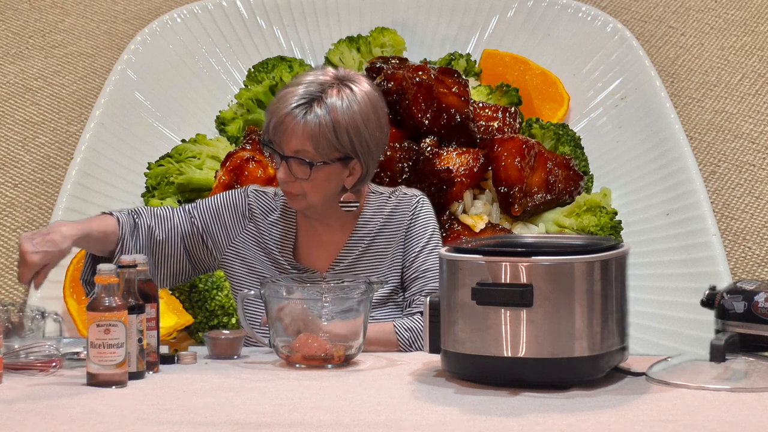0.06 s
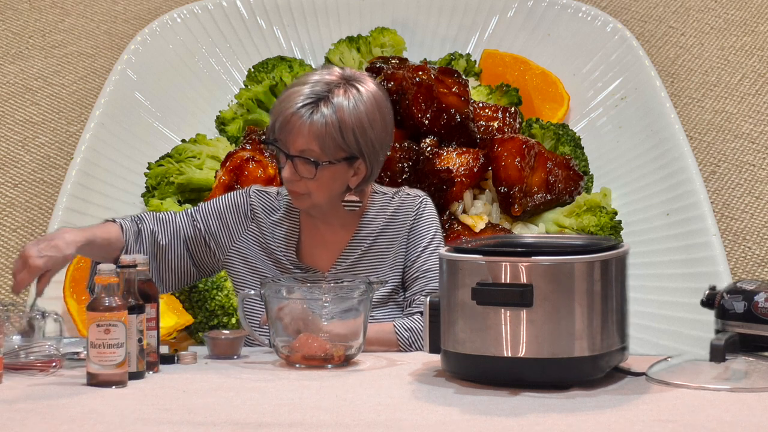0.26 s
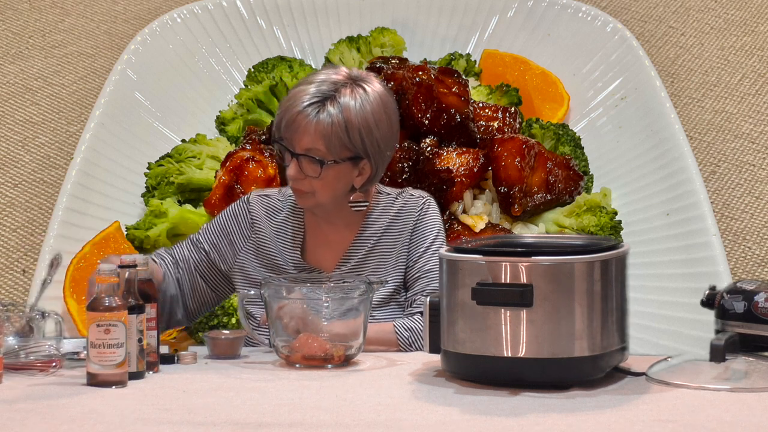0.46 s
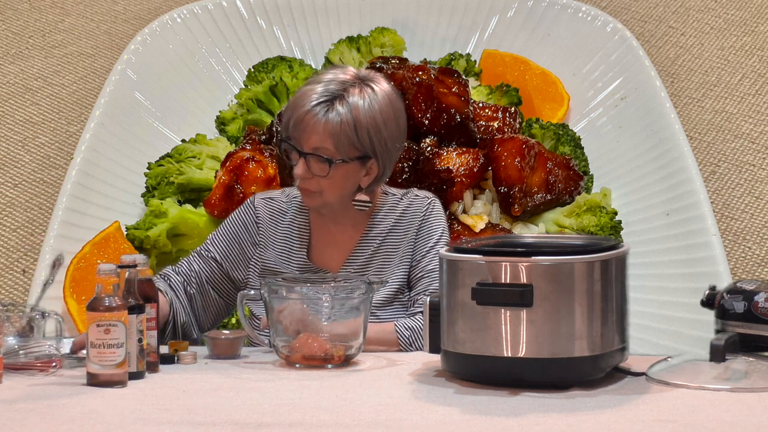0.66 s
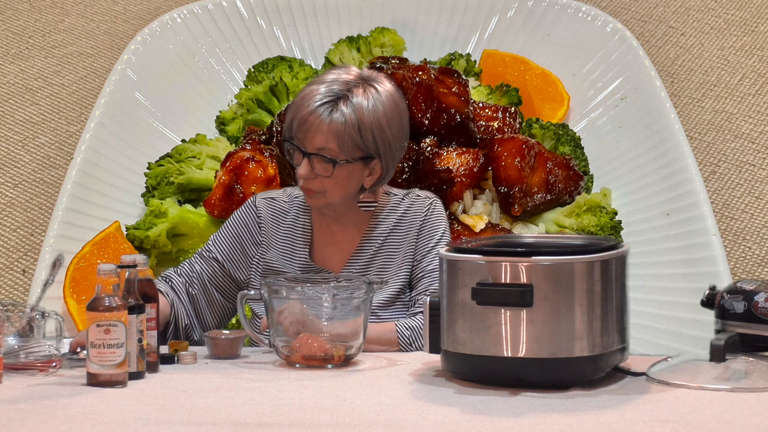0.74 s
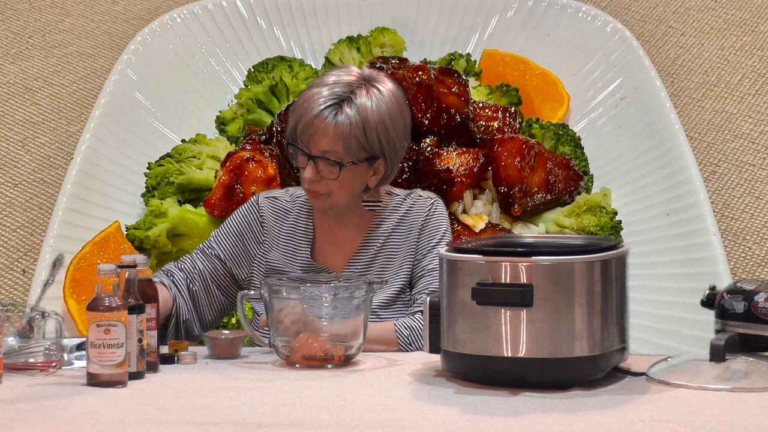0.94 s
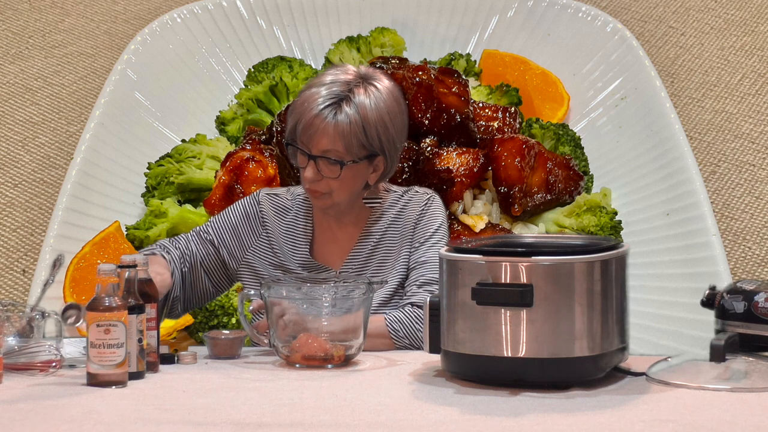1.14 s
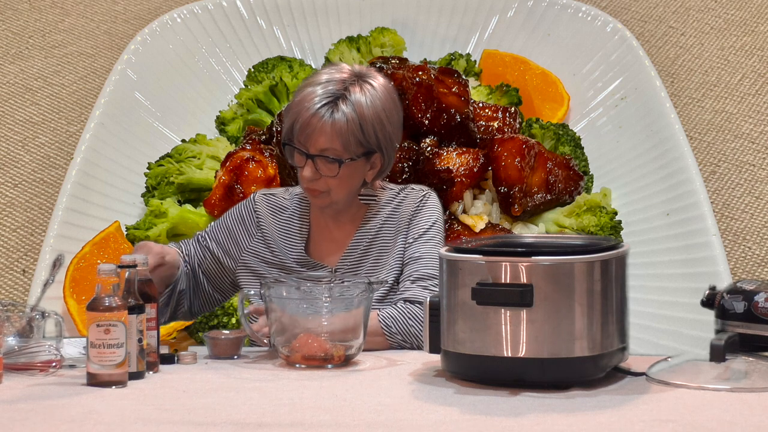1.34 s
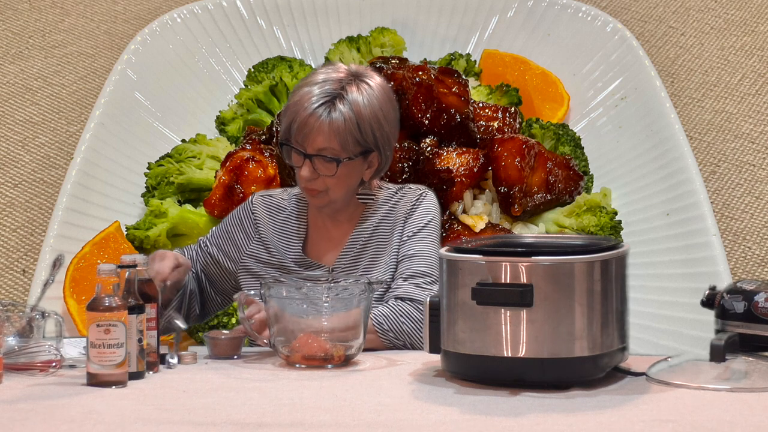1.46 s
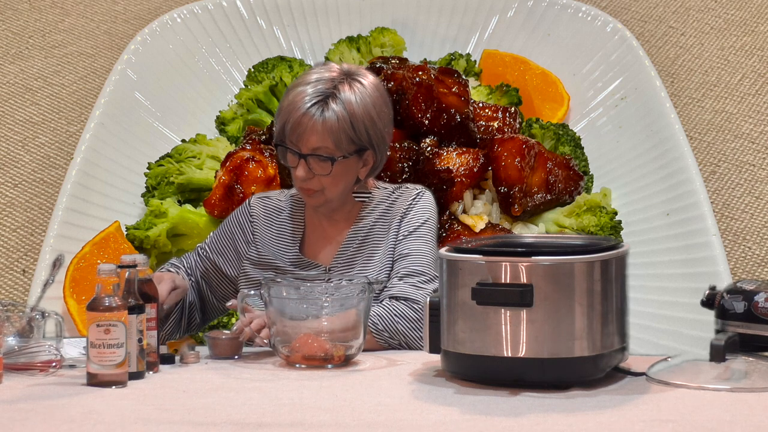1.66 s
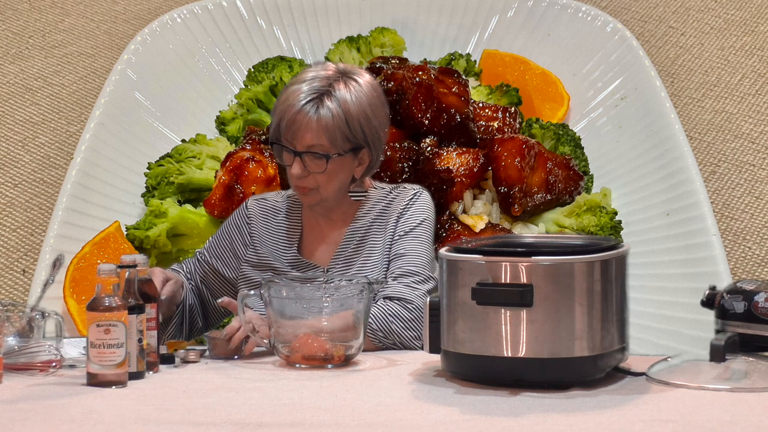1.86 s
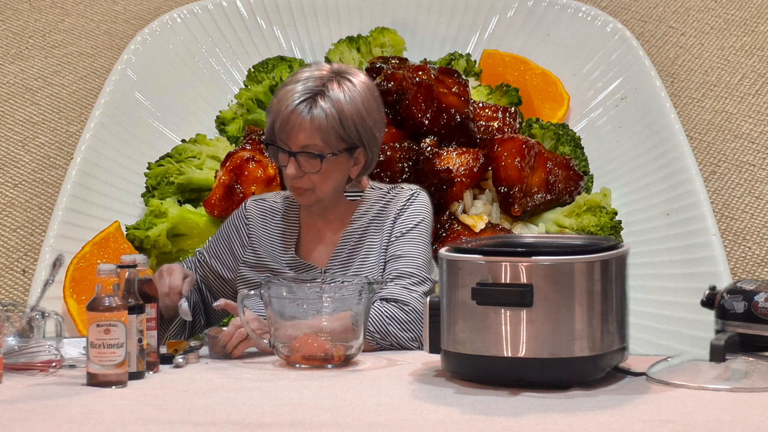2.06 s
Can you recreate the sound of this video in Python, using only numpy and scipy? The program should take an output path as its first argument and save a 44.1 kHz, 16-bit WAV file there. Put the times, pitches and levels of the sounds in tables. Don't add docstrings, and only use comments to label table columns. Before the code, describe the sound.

Clinking steel measuring utensils: light glass taps and a rattling drop, a short gritty slide, a brief pause, then a sharp bright clatter of cups and a few softer taps, recorded close in a reverberant room.

```python
import sys
import numpy as np
from scipy import signal
from scipy.fft import rfft, irfft, next_fast_len
from scipy.io import wavfile

SR = 44100
rng = np.random.default_rng(int(sys.argv[2]) if len(sys.argv) > 2 else 0)


def linear_from_db(decibels):
    return 10 ** (np.asarray(decibels, float) / 20)


def output_pcm(signal):
    pcm = np.clip(np.atleast_2d(signal).T, -1, 1) * 32767
    wavfile.write(sys.argv[1], SR, np.round(pcm).astype(np.int16))


N = 92610


def unit(x):
    return x / np.sqrt(np.mean(x ** 2) + 1e-20)


def along(points, hz):
    f, v = np.transpose(points)
    return np.interp(np.log(hz + 1), np.log(f + 1), v)


def filtered(x, response):
    n = x.shape[-1]
    m = next_fast_len(n + 8192)
    return irfft(rfft(x, m) * response(np.fft.rfftfreq(m, 1 / SR)), m)[..., :n]


def paired(pair, alike, gain=lambda hz: 1):
    def mid_side_gain(hz):
        turn = np.arccos(np.clip(along(alike, hz), -1, 1)) / 2
        return gain(hz) * np.array([np.cos(turn), np.sin(turn)])

    mid, side = filtered(pair, mid_side_gain)
    return np.array([mid + side, mid - side])


def resonance(center, width):
    return lambda f: 1j * f * width / (center * center - f * f + 1j * f * width)


def wobble(count, size, rate):
    at = np.arange(size) * rate / SR
    return np.array([np.interp(at, np.arange(len(row)), row) for row in rng.standard_normal((count, 400))])


# (frequency [Hz], t60 [s])
ROOM_DECAY = [(500, 0.78), (2000, 0.57), (5000, 0.32), (12000, 0.24)]
# (frequency [Hz], likeness [0..1])
ROOM_ALIKE = [(700, 0.39), (2500, 0.61), (5000, 0.82), (9000, 1), (14000, 0.71)]


def room(x):
    hz, t, z = signal.stft(rng.standard_normal((2, SR // 2)), SR, nperseg=256)
    decay = linear_from_db(-60 * t / along(ROOM_DECAY, hz)[:, None])
    tail = paired(signal.istft(z * decay, SR, nperseg=256)[1], ROOM_ALIKE)
    tail = tail * (1 - np.exp(-np.arange(tail.shape[1]) / SR / 0.0017))
    return signal.fftconvolve(x[None], tail / np.linalg.norm(tail[0]), axes=1)


def struck(hits, modes, clatter, ring_db, rough, clatter_db, clatter_t60, click_t60, tick_db, wet_db, pan_db,
           damped_s=np.inf):
    out, t = np.zeros((2, N + 2 * SR)), np.arange(SR * 2 // 5) / SR
    crowd_db = 3.5 * rng.standard_normal(500)
    hz, level, t60 = np.transpose(modes)[:, :, None]
    loudest = max(hit[1] for hit in hits)
    low_cut = signal.butter(6, 946, "high", fs=SR, output="sos")
    steadiness = np.repeat(np.clip(hz / 4200, .45, 1), 2, axis=0)

    def clatter_gain(f):
        return linear_from_db(along(clatter, f) + np.interp(f / 50, np.arange(500), crowd_db))

    for s, db, share_db, click_hz in hits:
        shake = wobble(count=2 * len(modes), size=len(t), rate=110.6) * rough * steadiness
        swell, phase = 4.6 * shake[::2], 1.64 * shake[1::2]
        ring = linear_from_db(level + swell - 60 * t / t60) * np.sin(2 * np.pi * hz * t + phase)
        ring = ring.sum(0) * linear_from_db(-np.clip(s + t - damped_s, 0, .015) * 900)

        click = linear_from_db(-60 * t / click_t60) * np.sin(2 * np.pi * click_hz * t)
        click = click * (1 - np.exp(-t / 0.000085)) * 1.17
        tick = linear_from_db(tick_db) * (t == 0)

        noise = unit(filtered(rng.standard_normal(len(t)), clatter_gain)) * linear_from_db(-60 * t / clatter_t60)
        body = linear_from_db(ring_db) * ring + linear_from_db(clatter_db) * noise
        blow = click + tick + linear_from_db(share_db) * body * (1 - np.exp(-t / 0.00052))

        softness_db = db + min(share_db, 0) - loudest
        blow = filtered(linear_from_db(db) * blow, lambda f: linear_from_db(0.45 * softness_db * f / 32400))
        blow = signal.sosfilt(low_cut, blow)
        wet, at, side = room(blow), round(s * SR), linear_from_db([[pan_db / 2], [-pan_db / 2]])
        out[:, at:at + len(t)] += blow * side
        out[:, at:at + wet.shape[1]] += linear_from_db(wet_db) * wet * side
    return out[:, :N]


# (frequency [Hz], density [dB per Hz])
RUMBLE = [(13, -31), (22, -19.5), (75, -1), (178, -5.5), (301, -3.5), (340, -7), (419, -5.5), (800, -22.5),
          (1040, -56), (1760, -120)]
# (frequency [Hz], density [dB per Hz])
HISS = [(700, -23.5), (1000, -3), (2270, -9), (6230, -23.5), (10400, -18.5), (15600, -18.5)]
# (frequency [Hz], width [Hz], level [dB])
FRIDGE_HUM = [
    (375.2, 46, -49),
    (426.5, 2.2, -49.5),
]
# (frequency [Hz], likeness)
AIR_ALIKE = [(60, 0.66), (240, 0.74), (700, 0.92), (3770, 0.32), (15000, 0.92)]


def kitchen_air():
    def layer(gain):
        return unit(paired(rng.standard_normal((2, N)), AIR_ALIKE, gain))

    air = linear_from_db(-43) * layer(lambda f: linear_from_db(along(RUMBLE, f)))
    air += linear_from_db(-48) * layer(lambda f: linear_from_db(along(HISS, f)))
    for hz, width, db in FRIDGE_HUM:
        air += linear_from_db(db) * layer(lambda f: resonance(hz, width)(f) ** 2)
    return air


# (time [s], peak level [dB], frequency [Hz])
CAVITY = [
    (0.031, -36, 1030),
    (0.046, -32.5, 1030),
    (0.114, -27, 1006),
    (0.277, -17, 1006),
    (0.481, -26.5, 988),
    (0.566, -29, 973),
    (0.77, -33, 912),
]


def jar_cavity():
    t = np.arange(N) / SR
    air = np.zeros(N)
    for s, db, hz in CAVITY:
        decay = linear_from_db(db - 60 * np.abs(t - s) / 0.061)
        onset = 1 - np.exp(-np.maximum(t - s, 0) / 0.0027)
        air += decay * onset * np.sin(2 * np.pi * hz * t)
    return air * linear_from_db([[1.4], [-1.4]]) + linear_from_db(-8) * room(air)[:, :N]


# (time [s], peak level [dB], ring share [dB], click [Hz])
RIM_TAPS = [
    (.1152, -21, -4, 2300),
    (.1182, -15, 0, 2260),
]
# (frequency [Hz], level [dB], t60 [s])
RIM_MODES = [(1764, -9, 0.26), (2085, -4.5, 0.26), (2216, 1.5, 0.056), (3000, 0, 0.094), (3603, -8, 0.26),
             (4750, -9.5, 0.2), (5332, -2, 0.25), (5900, -19, .2), (6659, -19.5, 0.2), (7294, -20, 0.21),
             (8550, -21, 0.039), (9300, -21, 0.04)]
# (frequency [Hz], density [dB per Hz])
JAR_CLATTER = [(470, -4.5), (800, -21), (2080, -14.5), (3860, -16.5), (10200, -22.5), (15500, -34)]


def rim_taps():
    return struck(RIM_TAPS, RIM_MODES, JAR_CLATTER, ring_db=-8.5, rough=1.0, clatter_db=-6, clatter_t60=0.084,
                  click_t60=0.013, tick_db=5, wet_db=-3, pan_db=2.5)


# (time [s], peak level [dB], ring share [dB], click [Hz])
JAR_HITS = [
    (.2765, -19, 0, 2500),
    (.2795, -14, 0, 2300),
    (.292, -16, -1, 2200),
    (.301, -22, -1, 2600),
    (.313, -18, -6, 2100),
]
# (frequency [Hz], level [dB], t60 [s])
JAR_MODES = [(2066, -8, 0.23), (2160, -12, 0.25), (2710, -19.5, 0.2), (3520, -21, 0.39), (4775, -15, 0.18),
             (5390, -13.5, 0.42), (5750, -22, 0.37), (7240, -24, 0.28), (8230, -18.5, 0.32),
             (9360, -18, 0.082), (10070, 1.5, 0.024), (10500, -14, 0.047), (11500, -25, 0.25)]
# (frequency [Hz], level [dB], t60 [s])
DROPPED_MODES = [(2518, 1.5, 0.2), (3280, 2, 0.083), (6430, -6, 0.3), (9030, -11, 0.08), (12700, -8, .2),
                 (13200, -17, 0.1), (14300, -15, 0.15), (14800, -17, .12), (14800, -15, 0.14)]


def spoon_drop():
    glass = struck(JAR_HITS, JAR_MODES, JAR_CLATTER, ring_db=9.5, rough=1.19, clatter_db=-1, clatter_t60=0.037,
                   click_t60=0.035, tick_db=-12, wet_db=-5, pan_db=3)
    spoon = struck(JAR_HITS[:3], DROPPED_MODES, JAR_CLATTER, ring_db=-8.5, rough=1.3, clatter_db=-0.5,
                   clatter_t60=0.22, click_t60=0.0025, tick_db=8, wet_db=-4, pan_db=-1)
    return glass + spoon


# (time [s], peak level [dB], ring share [dB], click [Hz])
JAR_NUDGES = [
    (.488, -24.5, 0, 2200),
    (.566, -25, 0, 2400),
    (.572, -22, 0, 2630),
]
# (frequency [Hz], level [dB], t60 [s])
NUDGED_MODES = [(2200, -5, .1), (2650, 0, .1), (3750, -6, .06), (4750, -5, .1), (5370, -6, .15),
                (6000, -7, .12)]


def jar_nudges():
    return struck(JAR_NUDGES, NUDGED_MODES, JAR_CLATTER, ring_db=-13, rough=1.0, clatter_db=-9, clatter_t60=0.029,
                  click_t60=0.025, tick_db=-27, wet_db=-2.5, pan_db=1.5)


# (time [s], peak level [dB], ring share [dB], click [Hz])
SPOON_TICKS = [
    (.6274, -16, -20, 4370),
    (.6288, -11, -8.5, 4160),
    (1.363, -46, 14, 5650),
    (1.372, -51, 6, 3980),
]
# (frequency [Hz], level [dB], t60 [s])
SPOON_MODES = [(3860, -10.5, 0.14), (4450, -7, 0.18), (4960, 0.5, 0.061), (6800, -7, 0.14),
               (7920, -21, 0.27), (9260, -11, 0.19), (12250, -6, 0.044)]
# (frequency [Hz], density [dB per Hz])
SPOON_CLATTER = [(470, -43), (800, -12), (1660, -15.5), (4480, -6), (5470, -11), (15500, -30)]


def spoon_ticks():
    return struck(SPOON_TICKS, SPOON_MODES, SPOON_CLATTER, ring_db=-12, rough=0.75, clatter_db=-9,
                  clatter_t60=0.18, click_t60=0.0047, tick_db=1, wet_db=-0.5, pan_db=1.5)


# (time [s], friction level [dB], fizz over
# friction [dB])
SLIDE_FORCE = [
    (.77, -54, -6),
    (0.821, -37, -7.5),
    (.85, -36, -2),
    (.870, -43, -3),
               (.874, -37.5, 6),
    (0.898, -31.5, 0),
    (.908, -37, -5),
    (.924, -34.5, -1),
    (.95, -35.5, -12),
    (.968, -34.5, -11),
    (.99, -44, -14),
    (1.03, -46, -18),
               (1.058, -37.5, -24),
    (1.15, -60.5, -26),
]
# (frequency [Hz], width [Hz], level [dB], time [s])
SLIDE_RES = [(2140, 110, -4, .845), (3850, 150, -1, .848), (9400, 200, -10, .845), (5260, 90, -1, .892),
             (10800, 140, -5, .898), (3750, 200, -4, .925), (5300, 150, -3, .928), (12300, 250, -9, .922),
             (5260, 60, 1, .972), (4800, 90, -3, .968), (5240, 60, -4, 1.0)]
# (frequency [Hz], density [dB per Hz])
SLIDE_GRIT = [(700, -21), (1100, -14.5), (2100, -5.5), (4500, -4.5), (7500, -11.5), (15500, -38)]


def slide():
    s, db, fizz_db = np.transpose(SLIDE_FORCE)
    t = np.arange(N) / SR
    force_db = np.interp(t, s, db, left=-120, right=-120)
    count = len(SLIDE_RES) + 2
    burst_db = np.minimum(4.5 * rng.exponential(size=N), 21)
    grit = rng.standard_normal((count, N)) * linear_from_db(burst_db)
    grit = grit * linear_from_db(2.2 * wobble(count=count, size=N, rate=70))

    tone = np.zeros(N)
    for grains, (hz, width, level, at) in zip(grit, SLIDE_RES):
        glint = 0.1 + np.exp(-((t - at) / 0.014) ** 2)
        tone += linear_from_db(level) * unit(filtered(grains * glint, resonance(hz, width)))
    hiss = unit(filtered(grit[-2], lambda f: linear_from_db(along(SLIDE_GRIT, f))))
    fizz = unit(filtered(grit[-1], lambda f: (f / (9000 + f)) ** 4 / (1 + (f / 13500) ** 6)))
    fizz = fizz * linear_from_db(np.interp(t, s, fizz_db))

    scrape = (linear_from_db(-15.5) * tone + hiss + linear_from_db(-2) * fizz) * linear_from_db(force_db)
    return linear_from_db(-2.5) * scrape * linear_from_db([[.7], [-.7]]) + linear_from_db(-6.5) * room(scrape)[:, :N]


# (time [s], peak level [dB], ring share [dB], click [Hz])
CUP_CLASH = [
    (1.515, -4, -15, 3200),
    (1.5175, -3, -13, 3200),
    (1.527, -7, -20, 3000),
    (1.530, -4, -20, 3100),
    (1.5345, -2, -9, 3500),
    (1.5362, -3, -5, 3400),
    (1.5378, -1, 0, 3400),
]
# (frequency [Hz], level [dB], t60 [s])
CUP_MODES = [(1820, -11.5, 0.024), (2400, -4, 0.033), (2842, -8, 0.034), (3435, -6, 0.037),
             (4827, -7.5, 0.12), (7370, -16.5, 0.3), (9130, -5, 0.042), (9600, -11, .03), (10980, 3, 0.019)]
# (frequency [Hz], density [dB per Hz])
CUP_CLATTER = [(530, -70), (900, -18.5), (3380, -12.5), (8340, -19), (11100, -17.5), (15500, -28)]


def cup_clash():
    return struck(CUP_CLASH, CUP_MODES, CUP_CLATTER, ring_db=-11.5, rough=0.84, clatter_db=-12, clatter_t60=0.11,
                  click_t60=0.0065, tick_db=-5, wet_db=-4.5, pan_db=2)


# (time [s], peak level [dB], ring share [dB], click [Hz])
CUP_FREED = [
    (1.546, -24, 7, 4040),
    (1.560, -30, 12, 3400),
    (1.5695, -8, -22, 3480),
]
# (frequency [Hz], level [dB], t60 [s])
SONG_MODES = [(3365, 0, 1.0), (4045, -1, .27), (4870, -9, .22), (5745, -22, .8), (6282, -16, .1),
              (7284, -13, .2), (9240, -10, .45)]


def freed_cup():
    closing_s = 1.638
    upper = struck(CUP_FREED[:1], SONG_MODES[1:], CUP_CLATTER, ring_db=2.5, rough=0.2, clatter_db=-10,
                   clatter_t60=0.35, click_t60=.003, tick_db=-28, wet_db=-12, pan_db=1.5,
                   damped_s=closing_s + .012)
    lowest = struck(CUP_FREED[1:], SONG_MODES[:1], CUP_CLATTER, ring_db=3, rough=0.2, clatter_db=-12,
                    clatter_t60=0.35, click_t60=.003, tick_db=-28, wet_db=-11, pan_db=2.5, damped_s=closing_s)
    return upper + lowest


# (time [s], peak level [dB], ring share [dB], click [Hz])
CUP_KNOCKS = [
    (1.712, -11, -4, 2800),
    (1.7162, 0, -3, 3600),
    (1.739, -9, 0, 3500),
]
# (frequency [Hz], level [dB], t60 [s])
HELD_MODES = [(2550, -13, 0.083), (2730, -13, .03), (3364, -1, 0.19), (3760, -4, 0.078), (4860, -4, 0.11),
              (5600, -17, 0.026), (7310, -4, .03), (9243, -21, 0.23), (10800, -13, .2)]
# (frequency [Hz], density [dB per Hz])
HELD_CLATTER = [(530, -64), (900, -52), (1060, -11.5), (3500, -2), (8050, -23), (15500, -21)]


def held_cup_knocks():
    return struck(CUP_KNOCKS, HELD_MODES, HELD_CLATTER, ring_db=-18, rough=0.43, clatter_db=-9, clatter_t60=0.053,
                  click_t60=0.0078, tick_db=-37, wet_db=-3, pan_db=1)


# (time [s], peak level [dB], ring share [dB], click [Hz])
CUP_TAPS = [
    (1.821, -8, 0, 3150),
    (1.826, -25, -9, 5950),
    (1.985, -19, 0, 2900),
    (1.987, -18, 0, 4100),
    (2.039, -12, 2, 3200),
    (2.043, -27, -9, 6150),
]
# (frequency [Hz], level [dB], t60 [s])
TAPPED_MODES = [(3235, -3, 0.046), (3490, 0.5, 0.046), (2700, -18, 0.075), (4000, -16.5, .08),
                (6160, -12, 0.043)]
# (frequency [Hz], density [dB per Hz])
TAP_CLATTER = [(530, -67), (1000, -17), (2400, -13.5), (3250, -4), (4500, -20), (8050, -28.5),
               (15500, -28.5)]


def held_cup_taps():
    return struck(CUP_TAPS, TAPPED_MODES, TAP_CLATTER, ring_db=-17.5, rough=1.4, clatter_db=-15.5,
                  clatter_t60=0.057, click_t60=0.0073, tick_db=-38, wet_db=-3.5, pan_db=1)


# (frequency [Hz], left over right [dB])
SHADOW = [(700, 1.5), (2800, 1.5), (5000, -0.5), (12000, -1)]


def scene():
    near = jar_cavity() + rim_taps() + spoon_drop() + jar_nudges() + spoon_ticks() + slide()
    near += cup_clash() + freed_cup() + held_cup_knocks() + held_cup_taps()
    near = filtered(near, lambda f: linear_from_db(np.outer([.5, -.5], along(SHADOW, f))))
    return kitchen_air() + near


def band_limit(x):
    return signal.sosfilt(signal.butter(12, 15800, fs=SR, output="sos"), x)


def record(dry):
    clipped = dry / (1 + np.abs(dry / .98) ** 8) ** (1 / 8)
    mix = filtered(clipped, lambda hz: hz < 15800)
    return band_limit(mix)


dry = scene()
out = record(dry)
output_pcm(out)
```